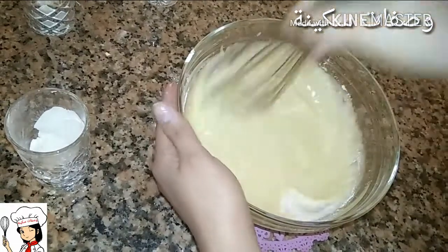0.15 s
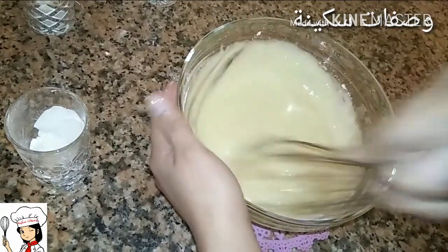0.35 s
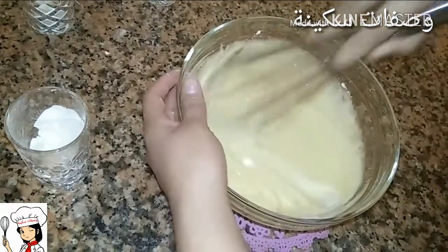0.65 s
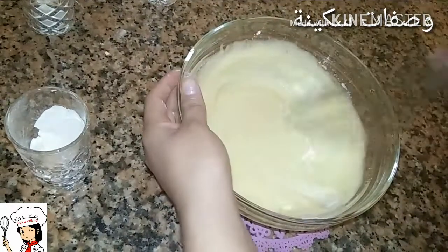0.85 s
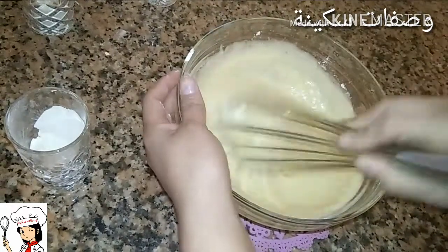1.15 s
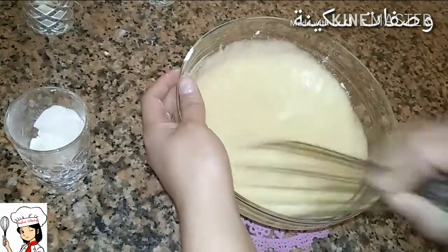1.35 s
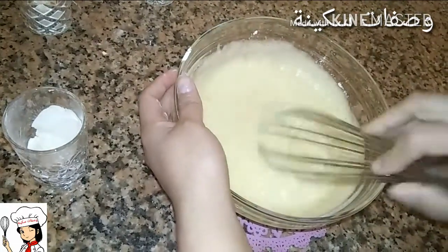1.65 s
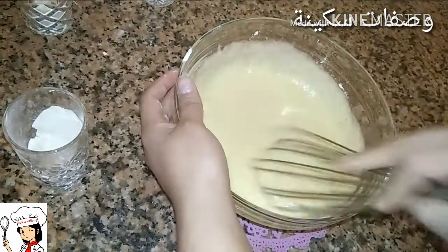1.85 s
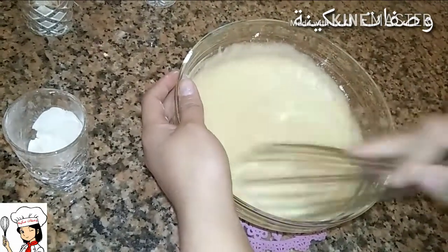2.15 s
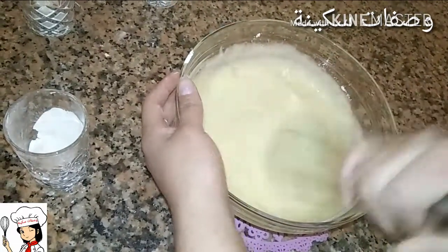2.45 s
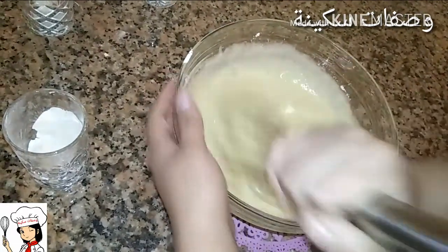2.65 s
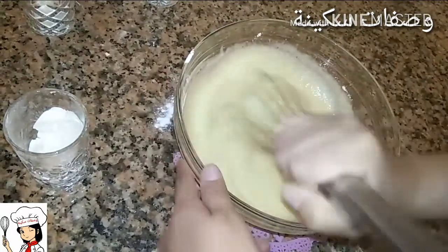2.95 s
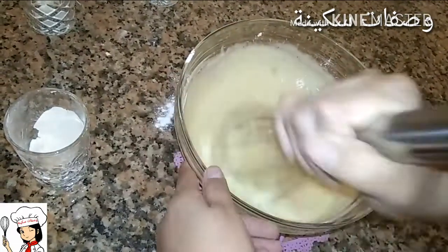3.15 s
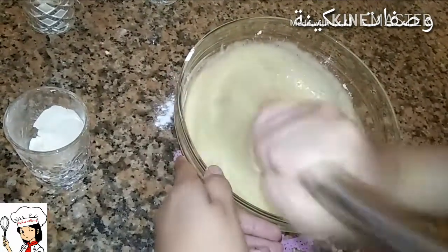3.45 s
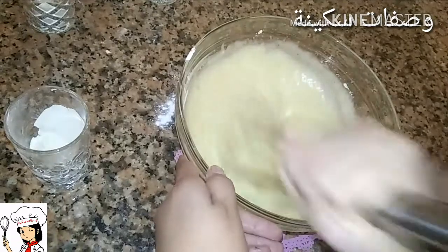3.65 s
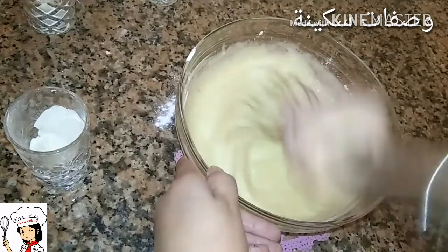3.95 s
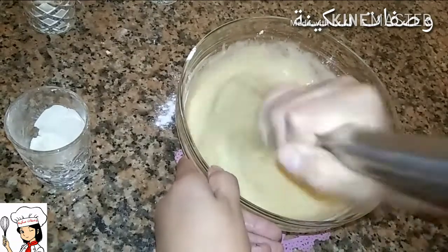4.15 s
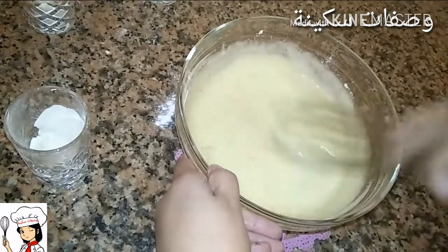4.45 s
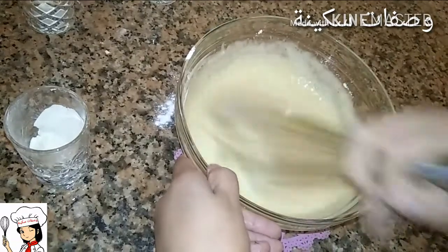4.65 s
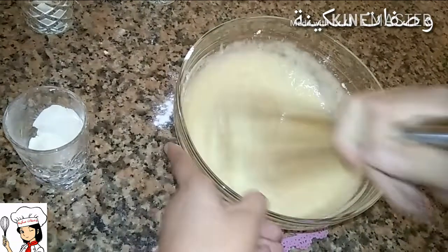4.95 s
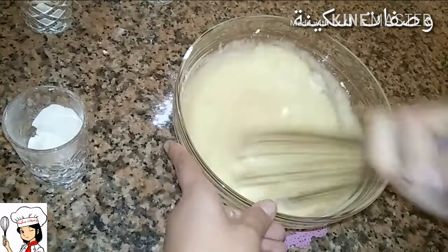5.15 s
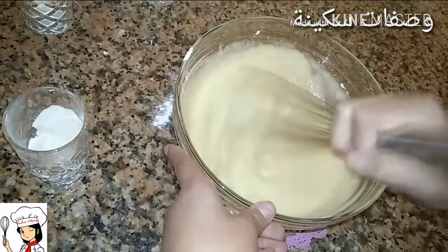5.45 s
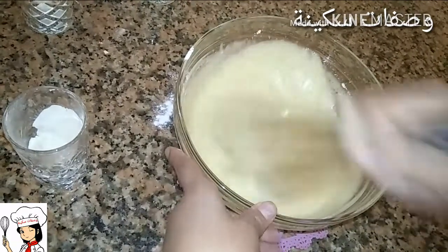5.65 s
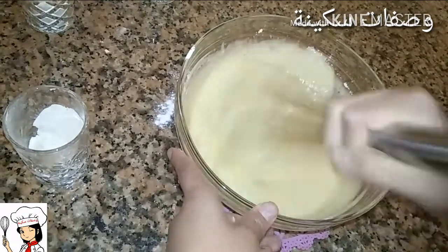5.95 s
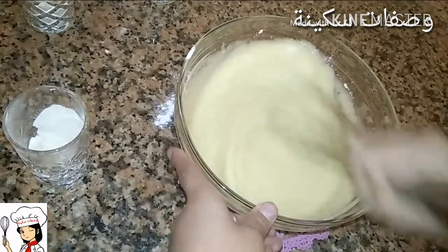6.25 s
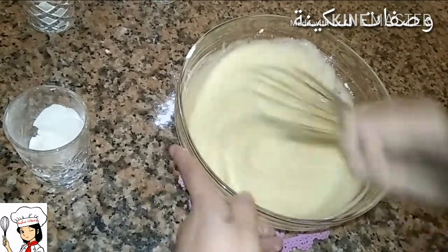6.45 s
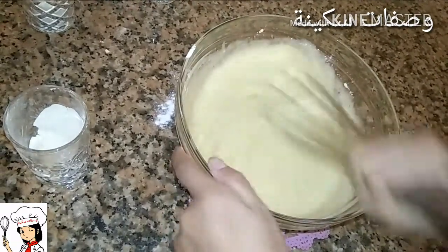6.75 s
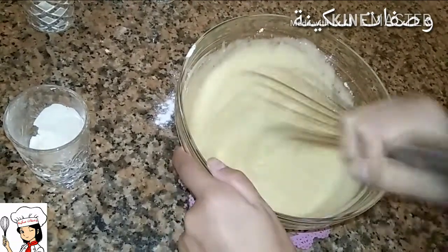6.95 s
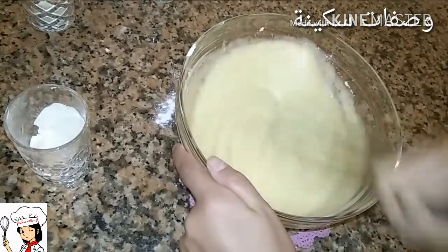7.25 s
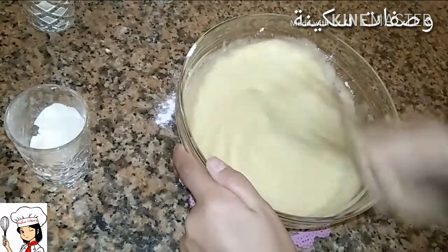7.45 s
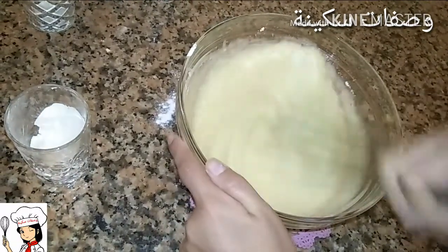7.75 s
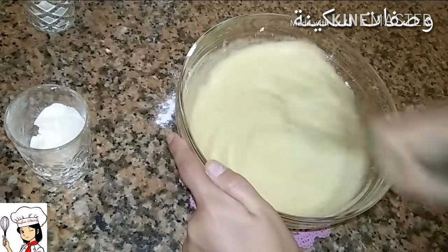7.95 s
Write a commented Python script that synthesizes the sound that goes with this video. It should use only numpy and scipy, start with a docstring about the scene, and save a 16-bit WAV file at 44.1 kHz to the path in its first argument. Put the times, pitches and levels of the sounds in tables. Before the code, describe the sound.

A fading glass ring opens over quiet kitchen hum. A whisk stirs heavy batter with soft squelches, hollow air plops and dull knocks, sometimes touching the glass with a short bright clink. A loud clink and low thump mark the bowl landing on the counter, followed by a brief lull. Wet strokes return and become a steady, brisk clinking. The microphone is near, with short indoor reverberation.

```python
"""A wire whisk beats thick batter in a glass bowl on a stone counter, in a bright kitchen.
Over faint hum and room noise an earlier stroke's ring fades on the glass; batter gurgles and fizzes as bubbles.
Bare wires soon clink on the ringing wall; coated wires and batter give dull clacks, with closing air plops.
At 4 s the bowl is knocked and thumps down on damped modes; near 6.7 s comes a low, soft squelch of batter.
From then on the clinks run at about four a second."""
import sys
import numpy as np
from scipy import signal
from scipy.io import wavfile
from scipy.ndimage import uniform_filter1d

SR = 44100
rng = np.random.default_rng(int(sys.argv[2]) if len(sys.argv) > 2 else 0)


def master(y):
    """Save y as 16-bit WAV."""
    cut = np.clip(np.atleast_2d(y).T, -1, 1)
    pcm = np.round(cut * 32767)  # scale
    wavfile.write(sys.argv[1], SR, pcm.astype(np.int16))


N = 357210

# Spectrum of a dull blow, for clacks and thumps. Each row: frequency in Hz, gain in dB.
CLACK_SPECTRUM = [(120, -4.5), (210, -21), (300, 1), (380, -10), (560, -8), (770, 7), (1000, 1),
                  (1700, -11.5), (2500, -5), (3300, -11.5), (4600, -4), (6500, -10.5), (9500, -22),
                  (14000, -34)]
HIT = np.arange(SR // 2) / SR  # time since a blow, s
PLOP_LAG_S = 0.003914  # from the tear to the closing of the pocket


def amp(db):
    """Level law: decibels to amplitude gain."""
    return 10 ** (np.asarray(db) / 20)


def unit(x):
    """Power normalisation: scales to rms 1."""
    return x / np.sqrt(np.mean(x ** 2) + 1e-20)


def unit_attack(x):
    """Onset normalisation: scales a hit to rms 1 over its first 20 ms."""
    return x / np.sqrt(np.mean(x[:SR // 50] ** 2) + 1e-20)


def read(points, hz):
    """Interpolation of a table on a logarithmic frequency axis."""
    f, value = np.transpose(points)
    return np.interp(np.log(hz + 1), np.log(f), value)


def add(mix, s, sound):
    """Superposition: mixes a sound in at time s."""
    part = mix[max(round(s * SR), 0):][:len(sound)]
    part += sound[:len(part)]


def colour(x, points, size=4096):
    """Minimum-phase filter: the Hilbert transform of the log gain gives a causal phase."""
    log_gain = np.log(amp(read(points, abs(np.fft.fftfreq(size, 1 / SR)))))
    taps = np.fft.ifft(np.exp(np.conj(signal.hilbert(log_gain)))).real
    return signal.oaconvolve(x, taps[:size // 2])[:len(x)]


def ring(push, hz, t60):
    """Damped resonance: one complex pole driven by a push."""
    pole = np.exp((2j * np.pi * hz - np.log(1000) / t60) / SR)
    return signal.lfilter([1], [1, -pole], push).imag


def grains(count, per_s, spread_db):
    """Shot noise: sparse random clicks of uneven size and either sign."""
    size = amp(spread_db * np.minimum(rng.exponential(1, count), 4))
    return size * rng.choice([-1, 1], count) * (rng.random(count) < per_s / SR)


def contact(rise, rattle, rattle_s):
    """Distributed impact: the wires land one after another in a few ms, then rattle briefly."""
    u = HIT / rise
    landing = u * np.exp(1 - u)
    rattling = rattle * np.exp(-HIT / rattle_s) * (1 - np.exp(-u))
    return grains(len(HIT), 9000, 4.88) * (landing + rattling)


def bubble(hz, life, glide):
    """Bubble resonance: an air pocket rings for a few cycles, rising in pitch as it closes."""
    u = HIT / life
    return u * np.exp(1 - u) * np.sin(2 * np.pi * hz * (HIT + glide * HIT ** 2))


def background(waver_db=3, count=12):
    """Steady sources: dull room noise, a motor whine, and a hum that wavers as a noise suppressor acts."""
    # Spectrum of the room noise. Each row: frequency in Hz, gain in dB.
    air_spectrum = [(30, -18), (50, 7), (72, -5), (100, -0.5), (140, 3), (210, -10.5), (600, -10),
                    (1100, -8.5), (1400, -9.5), (1750, -4), (2200, -9), (3000, -19), (8000, -19.5),
                    (14000, -24)]
    # Mains hum of a kitchen appliance. Each row: frequency in Hz, level in dB before suppression.
    hum_tones = [(49, -72.5), (98.5, -75.5)]
    # Faint tones of its motor. Each row: frequency in Hz, level in dB.
    whine_tones = [(442, -81), (1573, -85), (1720, -84)]
    t = np.arange(N) / SR
    # irregular level changes that the suppressor leaves on the hum
    waver_rates_hz = np.geomspace(.4, 4, count)
    waver = unit(sum(np.sin(2 * np.pi * (hz * t + rng.random())) for hz in waver_rates_hz))
    hum, whine = (sum(amp(db) * np.sqrt(2) * np.sin(2 * np.pi * (hz * t + rng.random()))
                      for hz, db in tones)
                  for tones in (hum_tones, whine_tones))
    air = amp(-69.5) * unit(colour(rng.standard_normal(N), air_spectrum))
    return hum * amp(waver_db * waver) + whine + air


def batter(count=28, cycles=2.48):
    """Bubble populations: pockets of every size gurgle and surface bubbles fizz, both with the effort."""
    # How hard the batter is moved. Each row: time in seconds, effort in dB.
    effort_curve = [(0, -58), (0.351, -81), (0.742, -82), (.85, -62.5), (1.098, -64), (1.48, -57),
                    (1.66, -52), (1.948, -68), (2.1, -50.5), (2.48, -58.5), (3.2, -59.5), (3.32, -54),
                    (3.821, -58.5), (4.14, -43), (4.421, -64), (4.6, -83.5), (4.8, -70.5), (4.949, -50.5),
                    (5.199, -57.5), (6.248, -49.5), (6.6, -56.5), (7.989, -56), (8.1, -78)]
    # Gurgle by pocket pitch. Each row: frequency in Hz, level in dB.
    churn_spectrum = [(270, -3.5), (370, -17), (520, -4.5), (780, 0.5), (1150, -1.5), (1600, -7.5),
                      (2400, -2)]
    # Spectrum of the surface bubbles. Each row: frequency in Hz, gain in dB.
    fizz_spectrum = [(1000, -23.5), (2500, 1), (5000, 7), (7500, 2.5), (10000, -13.5), (14000, -22.5)]
    effort_db = np.interp(np.arange(N) / SR, *np.transpose(effort_curve))
    # the fizz comes in irregular clumps
    clumps = unit(uniform_filter1d(uniform_filter1d(rng.standard_normal(N), size=900), size=300))
    # fizz grows 1.6 dB per dB of effort
    fizz_db = -77.5 + 1.6 * (effort_db + 58) + 7.6 * clumps
    gurgle = np.zeros(N)
    for hz in np.geomspace(270, 2500, count):
        pockets = signal.oaconvolve(grains(N, 35, 3.75), bubble(hz, cycles / hz, glide=2.62))[:N]
        gurgle += amp(read(churn_spectrum, hz)) * unit(pockets)
    fizz = amp(fizz_db) * unit(colour(grains(N, 1100, 1.86), fizz_spectrum))
    return amp(effort_db - 7.5) * unit(gurgle) + fizz


def earlier_ring():
    """Resonant decay: the fading ring of an earlier stroke on the glass, as noise with the wall's peaks."""
    # Strength of the fading ring. Each row: time in seconds, level before a common trim in dB.
    fading = [(0, -55), (.1, -61), (0.201, -62.5), (.27, -54.5), (.4, -84), (.6, -110)]
    # Spectrum of the fading ring. Each row: frequency in Hz, gain in dB.
    ring_spectrum = [(1000, -25.5), (1650, -14.5), (1900, 2.5), (2300, -24.5), (3300, -29), (3950, -14.5),
                     (4400, -22), (5100, -12.5), (5900, -35), (14000, -54)]
    level_db = np.interp(np.arange(N) / SR, *np.transpose(fading))
    return amp(level_db - 6.0) * unit(colour(grains(N, 2500, 3.0), ring_spectrum))


def clinks(tick_lead=0.00071):
    """Modal impact: steel ticks, then the wall cracks and rings in twin modes set by place and coating."""
    # Wires on glass. Each row: start in seconds, crack in dB and ring in dB (both before trims),
    # nominal pitch of the main mode in Hz, place along the wall (above 0 favours the main mode),
    # coating (below 0 bare, above 0 thick).
    strikes = [(0.268, -43.5, -42.5, 2083, -0.58, 0.77), (1.917, -39.5, -45, 2002, -0.077, -0.59),
               (2.656, -39.5, -41.5, 2050, -0.12, -0.95), (2.732, -42, -42.5, 2108, -0.2, -.7),
               (3.545, -38.5, -41, 2040, -0.14, -0.83), (3.696, -41, -55, 2166, -0.21, -0.53),
               (4.014, -29, -35.5, 1973, -0.36, -1.3), (4.026, -40, -42, 2120, -0.84, 0.17),
               (6.047, -39.5, -38, 2047, -0.53, -0.092), (6.282, -30, -36, 2040, 0.076, -0.57),
               (6.783, -34.5, -37, 2021, 0.071, -0.27), (7.03, -35, -43.5, 2040, 0.71, -0.3),
               (7.264, -34, -39.5, 1989, 1, -0.49), (7.496, -34.5, -37, 1982, 0.69, -0.59),
               (7.739, -34.5, -35.5, 1980, 0.37, -0.34)]
    # Wall modes of the filled bowl. Each row: frequency in Hz, nominal t60 in seconds, nominal split
    # to the twin mode in Hz, level in dB, dB gained per unit of place, share of the pitch shift.
    wall_modes = [(1110, 0.36, 21, -15, -8.5, 0), (2011, 0.059, 21, 6.5, 7, 0.92),
                  (3120, 0.038, 18, -2, -8.5, 0.16), (4375, 0.034, 130, 4, 3.5, 0),
                  (5733, 0.028, 230, -0.26, -5.5, 0)]
    # Spectrum of the steel tick. Each row: frequency in Hz, gain in dB.
    tick_spectrum = [(2000, -50), (5000, -7.5), (7500, 4), (10500, -4.5), (14000, -11)]
    # Spectrum of the crack. Each row: frequency in Hz, gain in dB.
    crack_spectrum = [(900, -31.5), (1600, -20), (2100, 7.5), (2450, 1.5), (2800, -3), (3150, 3),
                      (3700, 6.5), (4300, -13), (4700, 1.5), (5500, 10), (6500, -4.5), (7300, 5),
                      (9500, -19), (14000, -52)]
    # Spectrum of the knock. Each row: frequency in Hz, gain in dB.
    knock_spectrum = [(100, -20), (200, -14), (300, -12), (380, -30), (520, -14), (760, 1), (950, -0.5),
                      (1130, 0), (1400, -5), (1750, -12.5), (2600, -31.5), (9000, -53.5)]
    main_hz = wall_modes[1][0]
    out = np.zeros(N)
    for s, crack_db, ring_db, pitch_hz, place, coating in strikes:
        # a wet wire gives more knock than crack, and loses its top treble: 4.1 octaves per unit of coating
        knock_db = crack_db - 8.0 + 12.5 * coating
        top_hz = min(18000 * 2 ** (-4.1 * coating), SR / 2.2)
        film = signal.butter(2, top_hz, fs=SR)
        tick = colour(contact(rise=0.0018, rattle=0.036, rattle_s=0.016), tick_spectrum)
        tick = signal.lfilter(*film, unit_attack(tick))
        add(out, s - tick_lead, amp(crack_db - 7.0) * tick)
        push = contact(rise=0.0024, rattle=0.15, rattle_s=0.012)
        crack = signal.lfilter(*film, colour(push, crack_spectrum))
        add(out, s, amp(crack_db - 0.5) * unit_attack(crack))
        add(out, s, amp(knock_db) * unit_attack(colour(push, knock_spectrum)))
        for hz, t60, split, mode_db, place_db, shift in wall_modes:
            # a coated wire favours the low modes: -4.5 dB per octave about 2820 Hz
            coat_db = -4.5 * coating * np.log2(hz / 2820)
            db = ring_db + mode_db + place_db * place + coat_db
            # the batter's lie shifts the modes and lengthens their ring by varying amounts
            detuning = 1 + 0.0063 * rng.uniform(-1.05, 1)
            hz = hz * (pitch_hz / main_hz) ** shift * detuning
            lie_factor, parting = rng.uniform(0.74, 0.86, 2)
            push = contact(rise=0.0014, rattle=0.013, rattle_s=0.011)
            main = unit_attack(ring(push, hz, t60 / lie_factor))
            twin = unit_attack(ring(push, hz - split * parting, t60 / lie_factor))
            # the wall radiates only near its modes
            near_mode = signal.butter(2, [hz * .88, hz * 1.12], "band", fs=SR, output="sos")
            add(out, s, amp(db) * unit_attack(signal.sosfilt(near_mode, main + .5 * twin)))
    return out


def plop(hz, level_db=-7.5, squelch_db=-17):
    """Cavity closure: the batter tears with a squelch just before an air pocket closes and rings."""
    # Spectrum of the tear. Each row: frequency in Hz, gain in dB.
    squelch_spectrum = [(100, -36), (160, -15), (300, 0), (380, -3.5), (520, -1), (780, -2.5), (1300, -7),
                        (2200, -22), (5000, -28), (12000, -49)]
    tear = contact(rise=0.0042, rattle=0.1, rattle_s=0.01)
    out = amp(squelch_db) * unit_attack(colour(tear, squelch_spectrum))
    add(out, PLOP_LAG_S, amp(level_db) * bubble(hz, life=0.0063, glide=0.59))
    return out


def clacks(hardness=0.15, knock_db=-1.5, clack_db=-2.9, splash_db=-1.54):
    """Cushioned impact: knock, clack, splash and small plop; harder strokes cut the batter sooner."""
    # Strokes muffled by batter. Each row: start in seconds, level before trims in dB,
    # brightness in dB (below 0 a deep knock, above 0 a shallow splash).
    strokes = [(0.615, -72, 6), (0.799, -61.5, -5), (1.039, -69.5, 3), (1.236, -60.5, -2.5),
               (1.548, -49.5, -0.5), (2.152, -58.5, 4), (2.203, -61, -8), (2.34, -46, 0), (2.42, -57, -9.5),
               (2.645, -43.5, -4.5), (2.772, -53, -1), (2.858, -52.5, -2.5), (3.268, -39, 1.5),
               (3.359, -49.5, 2.5), (3.414, -45, 1), (3.897, -52, -6.5), (3.989, -49.5, 2),
               (4.27, -54, 0.5), (4.34, -60.5, 1), (4.944, -49, -3), (4.959, -47, 3.5),
               (5.259, -53.5, -5.5), (5.325, -57, -6.5), (5.399, -56.5, -1.5), (5.45, -54.5, -1),
               (5.552, -38.5, 0), (5.722, -45, 2), (5.811, -44.5, 3), (5.965, -49, 3), (6.132, -58.5, 18),
               (6.198, -45, -1), (6.21, -47, 5), (6.459, -47, 2), (6.691, -55.5, 8.5), (7.9, -51, -1)]
    out = np.zeros(N)
    bands = [(100, 1400), (1400, 3500), (3500, 15000)]  # knock, clack and splash, Hz
    rises = [.0055, .0028, .0023]  # s, before the cushioning
    for s, db, bright_db in strokes:
        # a hard stroke reaches the glass: extra clack above -43 dB
        bite_db = 0.13 * max(db + 43, 0)
        levels_db = [db + knock_db - bright_db, db + clack_db + bite_db, db + splash_db + bright_db]
        cushion = amp(-hardness * (max(levels_db) + 46.5))
        for band, rise, band_db in zip(bands, rises, levels_db):
            push = contact(rise * min(cushion, 1.4), rattle=0.12, rattle_s=0.0039)
            push = colour(push, CLACK_SPECTRUM)
            part = signal.sosfilt(signal.butter(3, band, "band", fs=SR, output="sos"), push)
            add(out, s + 0.000988, amp(band_db) * unit_attack(part))
        # every stroke squeezes a pocket shut; above -46 dB a harder knock squeezes no more air out
        pocket_hz = 770 * (1 + 0.14 * rng.uniform(-1.37, 1))
        add(out, s, amp(min(levels_db[0], -46) + 5.5) * plop(pocket_hz))
    return out


def plops():
    """Cavity resonance: large air pockets close in the wake of the whisk."""
    # Pockets closing between strokes. Each row: closing time in seconds, level before the plop's own
    # trims in dB, starting pitch in Hz.
    closures = [(1.045, -49, 1136), (1.282, -39.5, 750), (2.069, -40.5, 1060), (3.326, -42.5, 1130),
                (3.7, -40, 803), (3.942, -41.5, 716), (5.366, -39, 1140), (5.389, -42, 297),
                (5.44, -44, 290), (6.132, -39, 569), (6.673, -38, 761), (6.988, -40, 768),
                (7.419, -39, 780), (7.986, -38, 764)]
    out = np.zeros(N)
    for s, db, hz in closures:
        add(out, s - PLOP_LAG_S, amp(db) * plop(hz))
    return out


def thump():
    """Modal excitation: the heavy bowl rocks down and rings low modes, which also fill a later squelch."""
    # The landing, and a low squelch's body. Each row: start in seconds, level before a common trim in dB.
    landings = [(4.066, -24), (4.074, -43), (4.088, -26), (4.111, -39), (6.681, -41.5)]
    # What the landing rings with. Each row: frequency in Hz, relative level in dB, t60 in seconds.
    base_modes = [(120.2, 0.5, 0.16), (155, -1.5, 0.16), (207.4, -7.5, 0.22), (295, 0, 0.057),
                  (300, -1, 0.42), (440, -1.5, 0.053), (595.6, 0, 0.2), (743, -1, 0.081)]
    out = np.zeros(N)
    for s, db in landings:
        push = contact(rise=0.00097, rattle=0.2, rattle_s=0.019)
        body = sum(amp(mode_db) * unit_attack(ring(push, hz, t60)) for hz, mode_db, t60 in base_modes)
        blow = 1.43 * unit_attack(colour(push, CLACK_SPECTRUM))
        add(out, s, amp(db - 8.0) * unit_attack(body + blow))
    return out


def kitchen(x, wet_db=-3.5, build_s=0.00043):
    """Room response by convolution: near reflections and a dense tail dying band by band."""
    # Reverberation by band. Each row: frequency in Hz, t60 in seconds.
    reverberation = [(150, .48), (500, .42), (1400, .48), (3500, .54), (6000, .53), (10000, .46),
                     (14000, .4)]
    # Counter and walls close by. Each row: delay in seconds, gain.
    reflections = [(.0023, -0.021), (.0051, -0.047), (.0074, -0.049), (0.0112, -0.19), (0.0145, .1),
                   (.0312, 0.11)]
    t = np.arange(SR) / SR
    hz, at, z = signal.stft(grains(SR, 5000, 0), SR, nperseg=256)
    decay = 1000. ** (-at / read(reverberation, hz)[:, None])
    tail = signal.istft(z * decay, SR, nperseg=256)[1][:SR]
    tail = tail * (1 - np.exp(-t / build_s))
    tail = colour(tail, [(200, 0.95), (2000, 0.54), (5000, -2.2), (12000, -0.38)])  # (Hz, dB)
    response = amp(wet_db) * tail / np.linalg.norm(tail)
    for delay, gain in reflections:
        add(response, delay, np.array([gain]))
    return signal.fftconvolve(x, response)[:N]


def scene():
    """Superposition of near sounds, room and background; the microphone cuts the near sounds' deep bass."""
    near = clinks() + clacks() + plops() + thump() + batter() + earlier_ring()
    near = signal.sosfilt(signal.butter(5, 105, "high", fs=SR, output="sos"), near)
    return (near + kitchen(near) + background())[None]


def record(dry, knee_db=-66, depth_db=6, slope=1.0):
    """Downward expansion: a noise suppressor lowers the treble when it is weak; then the band limit."""
    treble = signal.sosfiltfilt(signal.butter(4, 2700, "high", fs=SR, output="sos"), dry)
    power_db = 10 * np.log10(abs(uniform_filter1d(treble ** 2, size=700)) + 1e-14)
    cut_db = np.clip(slope * (knee_db - power_db), 0, depth_db)
    quiet = dry - treble * (1 - amp(-cut_db))
    band_limit = signal.firwin(255, 14500, window=("kaiser", 8), fs=SR)
    return signal.oaconvolve(quiet, band_limit[None], "same")


dry = scene()
out = record(dry)
master(out)
```